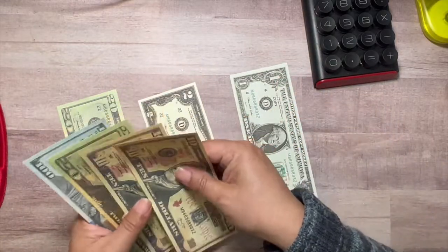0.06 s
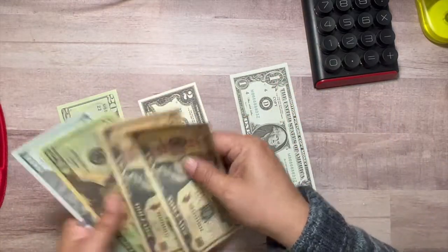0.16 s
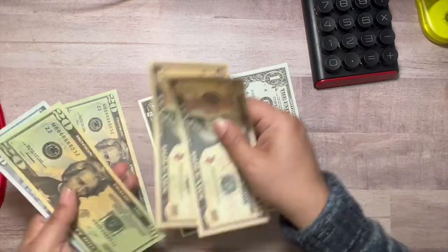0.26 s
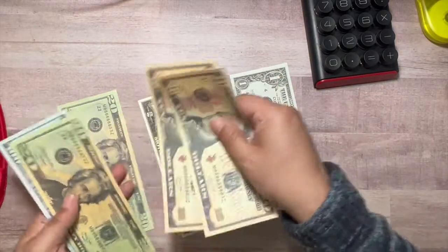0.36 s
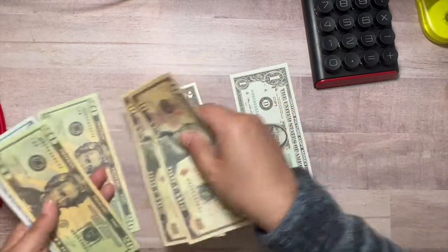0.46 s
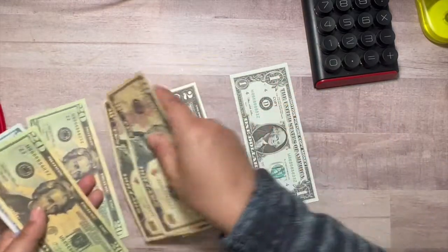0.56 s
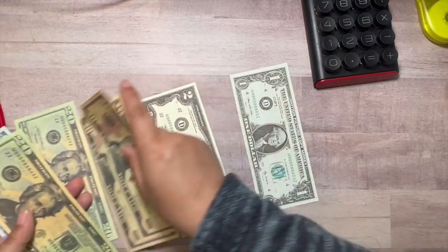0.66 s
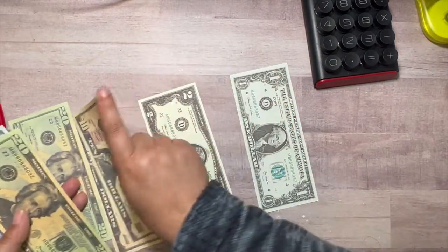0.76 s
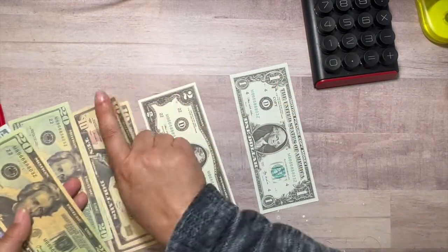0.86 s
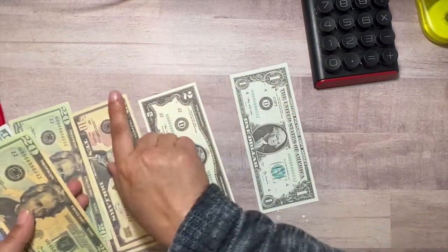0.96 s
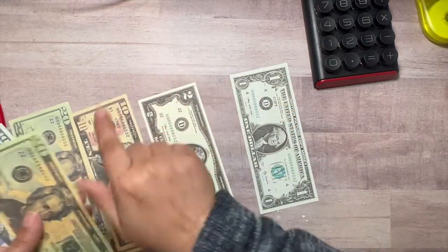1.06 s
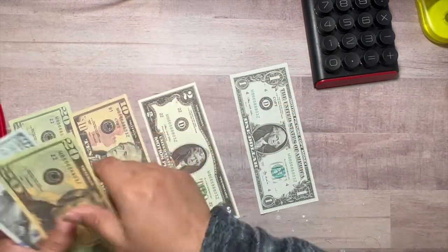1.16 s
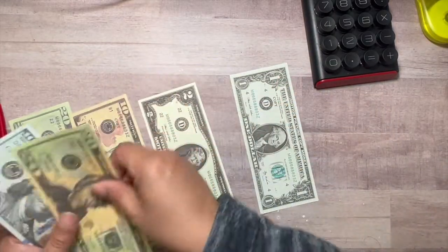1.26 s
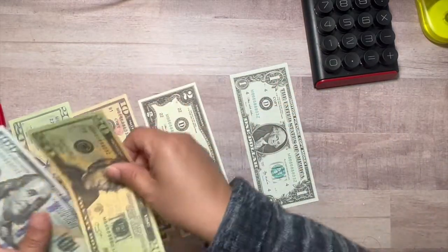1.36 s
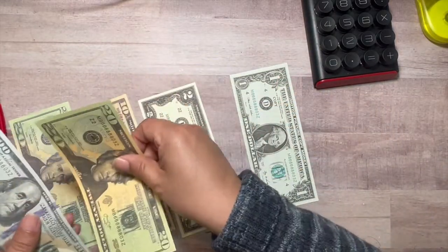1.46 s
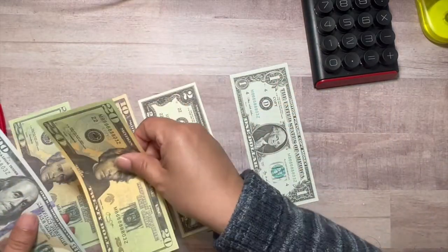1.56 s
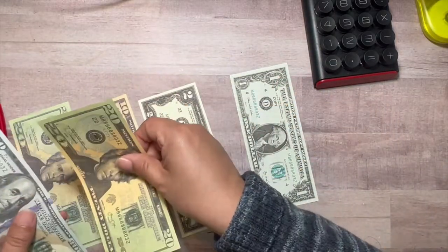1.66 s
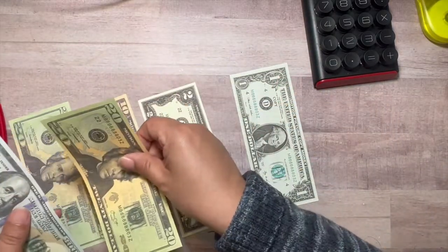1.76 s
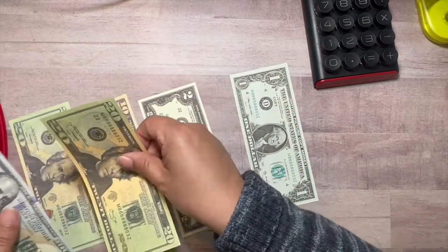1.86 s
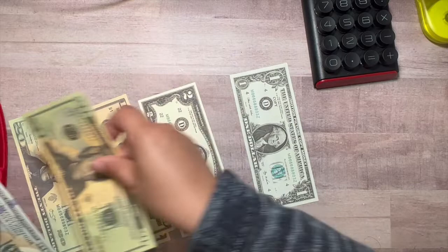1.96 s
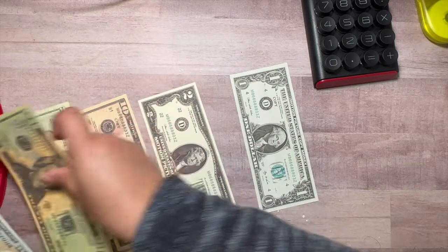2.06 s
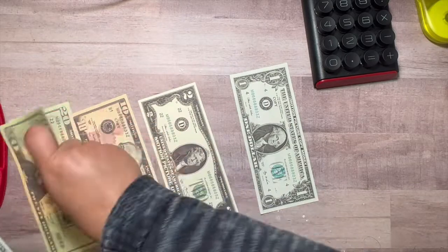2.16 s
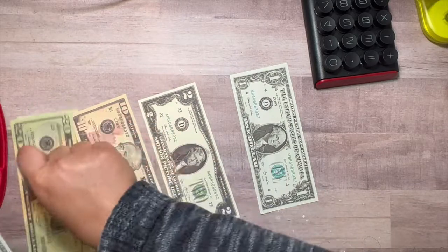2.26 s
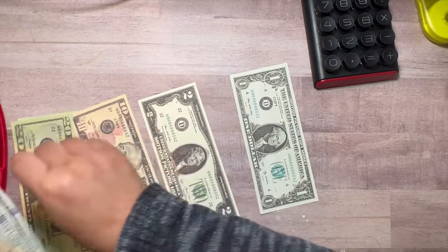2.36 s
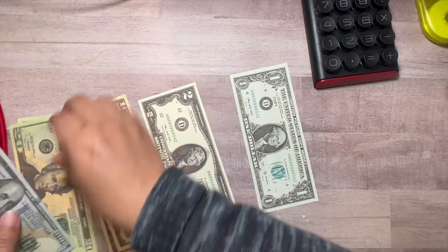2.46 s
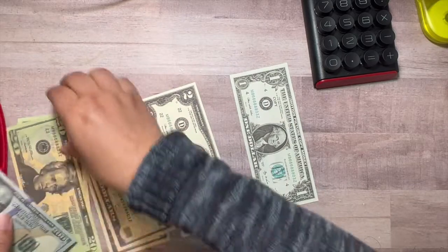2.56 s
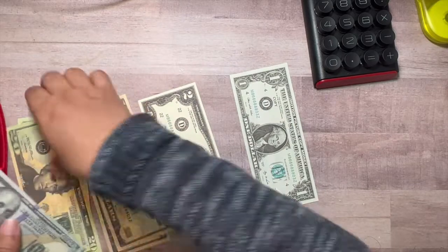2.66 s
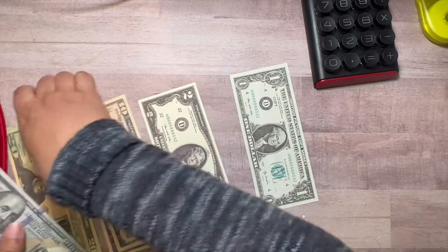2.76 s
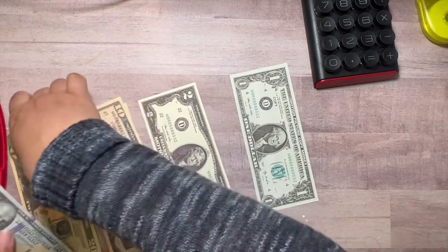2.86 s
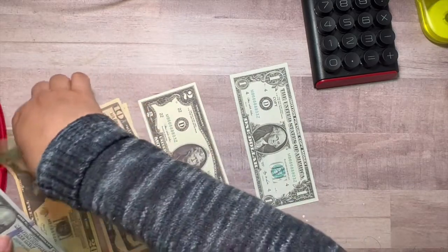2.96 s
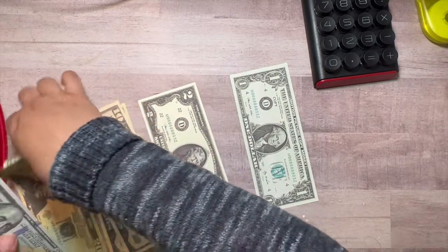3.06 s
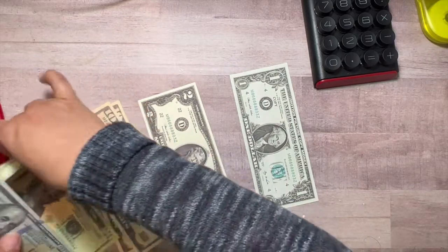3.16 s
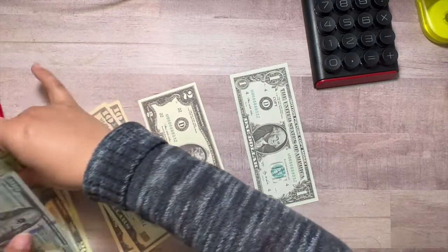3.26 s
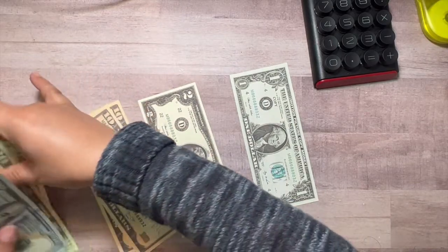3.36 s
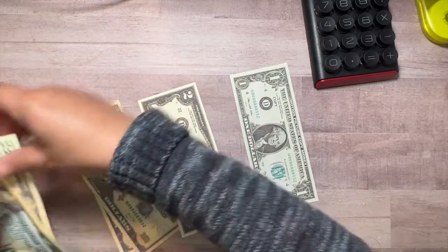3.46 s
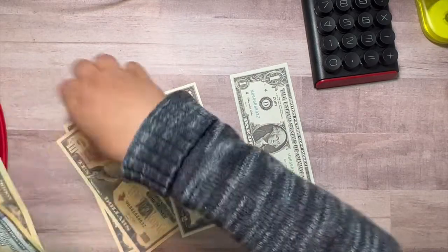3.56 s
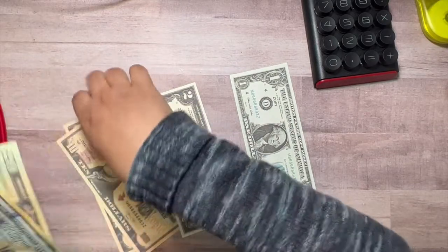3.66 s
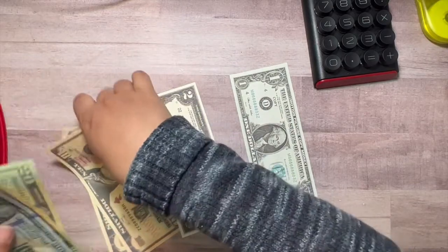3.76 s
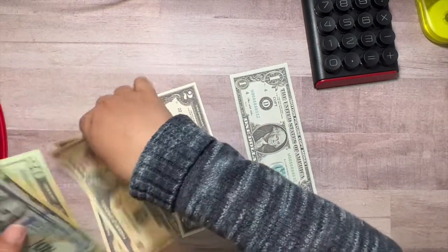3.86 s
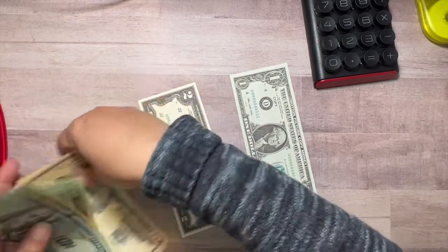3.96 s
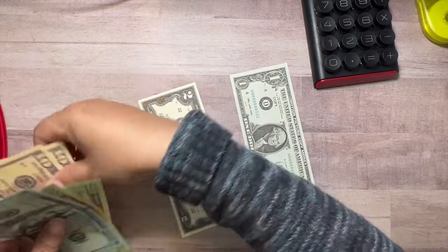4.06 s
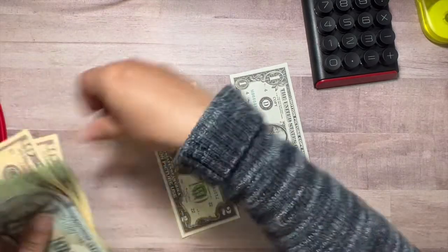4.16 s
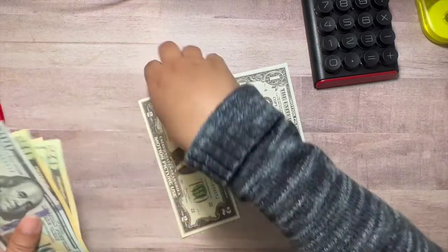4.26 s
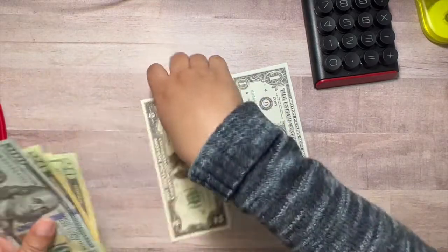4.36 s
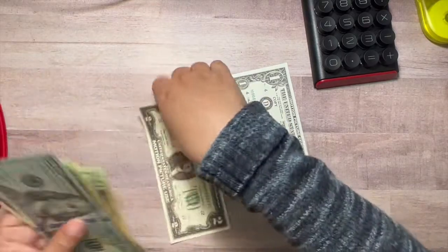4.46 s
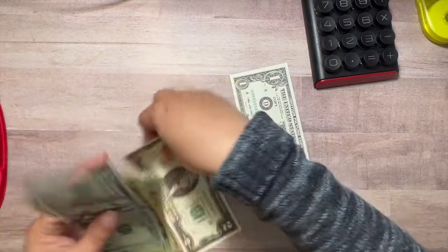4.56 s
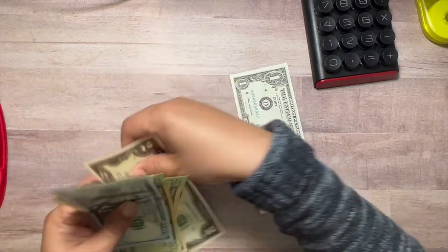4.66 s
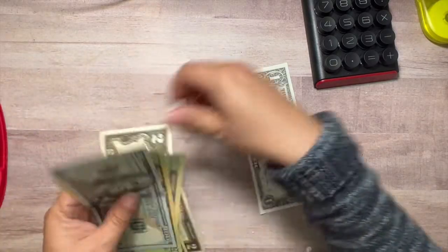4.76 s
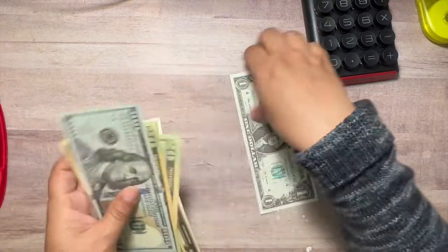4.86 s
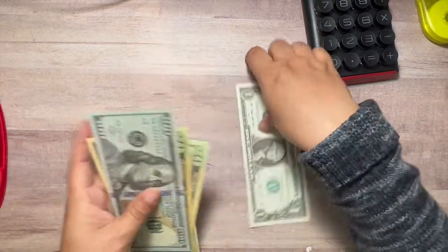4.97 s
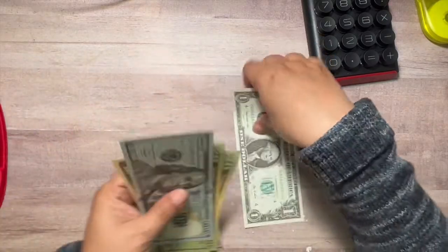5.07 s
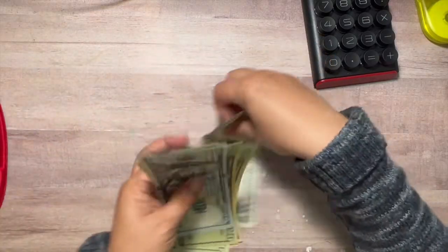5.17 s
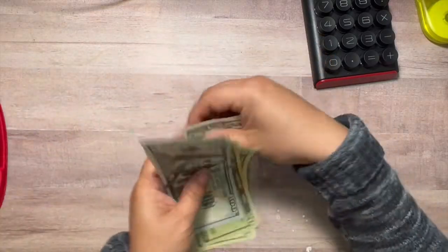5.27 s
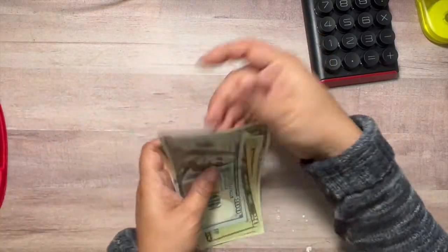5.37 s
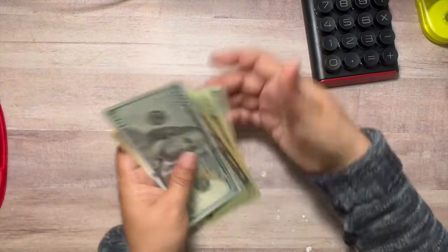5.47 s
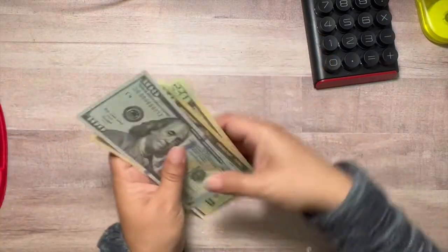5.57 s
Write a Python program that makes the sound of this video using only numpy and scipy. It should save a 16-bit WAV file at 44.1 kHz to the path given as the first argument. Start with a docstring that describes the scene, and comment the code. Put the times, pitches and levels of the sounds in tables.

```python
"""Hands sort paper notes on a wooden table: two ports of a microphone, quiet room, 5.6 s.
From the start: faint air and rumble, hiss and flap of the shifting bundle (noise, clumped clicks).
From 0.06 s sheets slide (swells of the same) and creases snap (short shaped noise with a tail).
From 0.66 s fingertips thud (falling sines, ringing modes); from 1.3 s short low hums swell up."""
import sys
import numpy as np
from scipy import signal
from scipy.fft import rfft, irfft
from scipy.io import wavfile
from scipy.ndimage import uniform_filter1d

SR = 44100
rng = np.random.default_rng(int(sys.argv[2]) if len(sys.argv) > 2 else 0)


def store_wav(level_fs):
    """Save 16-bit WAV to argv[1]."""
    pcm = np.round(np.clip(np.atleast_2d(level_fs), -1, 1) * 32767)
    wavfile.write(sys.argv[1], SR, pcm.T.astype(np.int16))


def how_loud(loudness_db):
    """Turn decibels into a plain amplitude multiplier (0 dB gives 1, 20 dB gives 10)."""
    steps = np.asarray(loudness_db, float) / 20
    return 10 ** steps


N = 247401
T = np.arange(N) / SR
HZ = np.fft.rfftfreq(512, 1 / SR)

# the held bundle shifts all the while: t/s, level/dB, hiss tilt/(dB per octave)
BUNDLE = [(0, -57.5, 4), (.95, -65, -3), (1.08, -58, -0.5), (1.4, -65.5, 1), (1.51, -77.5, -5),
          (1.75, -92, -2), (1.93, -59, -0.5), (2.5, -75, -4), (2.97, -59, 0), (3.87, -53.5, 0),
          (4.2, -55, 0.5), (4.5, -49, 0.5), (4.9, -59.5, -0.5), (5.07, -49.5, 0.5), (5.52, -57.5, 2)]
# creases popping, or crumpling when long: t/s, level/dB, centre f/Hz, fall-off/(dB per octave), length/ms
CREASES = [(0.0873, -35, 850, 5.5, 2.7), (0.157, -40, 860, 18, 24), (0.2473, -38.5, 980, 5, 4.8),
           (0.3392, -39.5, 874, 5.5, 6.2), (1.110, -45, 740, 6, 20), (1.161, -49, 400, 3, 8.9),
           (1.1882, -25, 2160, 3, 3.9), (1.526, -53, 3530, 0, 11), (1.825, -46, 1050, 26, 4.6),
           (1.949, -43, 1890, 3, 24), (1.994, -40.5, 3280, 2.5, 15), (2.016, -34, 4330, 8.5, 26.5),
           (2.0995, -27.5, 2310, 13.5, 9.5), (2.1461, -29.5, 2200, 3.5, 3.3), (2.322, -51, 4520, 22.5, 50),
           (2.3888, -50, 800, 9.5, 21.6), (2.6044, -41, 5050, 4, 3.8), (2.7581, -21, 2180, 6.5, 1.2),
           (2.901, -32, 2480, 28, 5.1), (2.925, -29.5, 2060, 3.5, 6.1), (3.065, -45, 4430, 12, 3),
           (3.2079, -29.5, 1850, 2.5, 3.1), (3.281, -35.5, 900, 4, 15), (3.333, -37.5, 950, 5, 11),
           (3.3811, -37, 970, 5.5, 5), (3.4969, -36.5, 945, 12, 4.2), (3.671, -29.5, 4700, 14, 2.1),
           (3.757, -18.5, 3300, 4.5, 3.84), (3.8069, -24, 4570, -2.5, 2.6), (3.9765, -29.5, 1200, 8.5, 13),
           (4.0003, -27, 1650, 7, 4.6), (4.0477, -27, 1310, 7.5, 3.9), (4.2035, -32, 3100, 7.5, 0.98),
           (4.3482, -29, 4020, 8, 2.3), (4.3657, -27.5, 3280, 7, 8.8), (4.3718, -14.5, 4960, 8.5, 8.8),
           (4.599, -31, 4250, 1, 11), (4.6407, -17.5, 3130, 4, 4.8), (4.942, -30, 10540, -12, 4.4),
           (4.9586, -16.5, 10400, 7, 5.1), (5.219, -25, 1510, 5.5, 4.2), (5.2782, -27.5, 1370, 6, 5.9)]
# fingertips and knuckles landing on wood: t/s, level/dB, nominal f/Hz
LANDINGS = [(0.657, -42, 330), (0.787, -47.5, 127), (2.143, -36, 135), (2.604, -37.5, 223),
            (2.693, -33.5, 231), (3.57, -37, 235), (3.635, -34.5, 245), (4.224, -34.5, 170),
            (4.311, -38, 268), (4.838, -32, 183), (4.905, -37, 154), (5.57, -46.5, 455)]


def evened(x):
    """Scales to rms 1."""
    return x / np.sqrt(np.mean(x ** 2) + 1e-20)


def read(points, hz):
    """Reads a table on a log-frequency axis."""
    f, value = np.transpose(points)
    return np.interp(np.log(hz + 1), np.log(f + 1), value)


def coloured(x, points):
    """Minimum-phase filter of the given spectral shape, taps scaled to unit energy."""
    log_gain = np.log(how_loud(read(points, abs(np.fft.fftfreq(8192, 1 / SR)))))
    taps = np.fft.ifft(np.exp(np.conj(signal.hilbert(log_gain)))).real[:4096]
    taps = taps / np.linalg.norm(taps)
    return signal.oaconvolve(x, taps.reshape((1,) * (x.ndim - 1) + (-1,)), axes=-1)[..., :N]


def add(mix, s, sound):
    """Mixes a sound in at a time."""
    part = mix[max(round(s * SR), 0):][:len(sound)]
    part += sound[:len(part)]


def room_floor():
    """Faint air, partly common to both ports, and a lumpy common rumble as the stand shakes."""
    # f/Hz, relative level/(dB per Hz)
    air_shape = [(60, -5.5), (600, -26), (16000, -43)]
    # t/s, level/dB
    rumble_db = [(0, -67), (1.6, -84), (5, -65.5)]
    z = rng.standard_normal((4, N))
    air = how_loud(-76.5) * coloured(0.93 * z[:2] + z[2], air_shape)
    rumble = coloured(z[3], [(25, -24), (55, -11.0), (400, -39.5)])
    return air + how_loud(np.interp(T, *np.transpose(rumble_db))) * rumble


def rubbing(per_s, grain_share, flutter_db):
    """Fibres hiss while tiny buckles click in clumps; contact pressure flutters."""
    flutter = evened(uniform_filter1d(rng.standard_normal(N), size=300))
    size = how_loud(3 * np.minimum(rng.exponential(1, N), 3))
    struck = rng.random(N) < per_s * np.exp(flutter) / SR
    clicks = size * struck * rng.standard_normal(N)
    hiss = rng.standard_normal(N)
    return evened((hiss + grain_share * evened(clicks)) * how_loud(flutter_db * flutter))


def effort():
    """Bundle, strokes, settling and slapped sheets add up in power: gains of hiss and of flap."""
    # sheets pulled over each other: t/s, length/s, level/dB, slackness (flap over hiss)/dB
    pulls = [(0.057, 0.12, -50.5, -7), (0.588, 0.12, -45.5, -24), (0.721, 0.078, -50.5, -18),
             (0.835, 0.011, -47.5, -23), (1.106, 0.042, -51.5, -2.5), (1.226, 0.094, -47.5, -19),
             (1.725, 0.024, -65.5, -11), (2.851, 0.095, -48.5, -7), (3.133, 0.073, -53, -39),
             (3.447, 0.027, -51, -0.5), (3.55, 0.041, -48.5, -12), (3.859, 0.05, -43, -14),
             (3.935, 0.04, -40.5, -25), (4.729, 0.011, -38.5, -9), (4.809, 0.013, -43, -7.5),
             (5.152, 0.11, -42.5, -9.5), (5.553, 0.025, -51, -2)]
    grip_s, let_go_db_per_s = 0.01, 346
    settle_db, settle_db_per_s, settle_slack_db = -18, 219, -11.5
    slap_db, slap_slack_db = -35, 10.5
    bundle_slack_db = -12.5

    rows = [(s, length, db, slack_db, let_go_db_per_s) for s, length, db, slack_db in pulls]
    # after a snap the sheets slide back to rest
    rows += [(s, 0, db + settle_db, settle_slack_db, settle_db_per_s) for s, db, *_ in CREASES]
    # a landing hand also slaps the notes under it
    rows += [(s, 0, db + slap_db, slap_slack_db, let_go_db_per_s) for s, db, _ in LANDINGS]

    bundle_db = np.interp(T, *np.transpose(BUNDLE)[:2])
    power = how_loud(2 * bundle_db) * how_loud([[0], [2 * bundle_slack_db]])
    t = T[:SR // 2]
    for s, length, db, slack_db, fall_db_per_s in rows:
        onset = np.minimum(t / grip_s, 1) ** 2
        shape = onset * how_loud(db - fall_db_per_s * np.maximum(t - length, 0))
        add(power[0], s, shape ** 2)
        add(power[1], s, (how_loud(slack_db) * shape) ** 2)
    return np.sqrt(power)


def brightened(x):
    """Tilts the spectrum above 1 kHz about 4 kHz as the grip tightens or slackens."""
    _, t, z = signal.stft(x, SR, nperseg=512)
    s, _, tilt_db = np.transpose(BUNDLE)
    octaves = np.log2(np.maximum(HZ, 1000) / 4000)[:, None]
    tilted = z * how_loud(octaves * np.interp(t, s, tilt_db))
    return signal.istft(tilted, SR, nperseg=512)[1][:N]


def patchy(x, patchy_db):
    """The bending sheet favours now one stretch of pitch, now another."""
    z = signal.stft(x, SR, nperseg=512)[2]
    patches = uniform_filter1d(rng.standard_normal(z.shape), size=14, axis=0)
    patches = evened(uniform_filter1d(patches, size=9, axis=1))
    return signal.istft(z * how_loud(patchy_db * patches), SR, nperseg=512)[1][:N]


def strokes():
    """Sliding excites fine hiss and the slack low flap of the whole sheet."""
    # f/Hz, relative level/(dB per Hz)
    slide_shape = [(450, -18), (2000, -1), (7000, 2), (9000, -3.5), (16000, 0)]
    # f/Hz, relative level/(dB per Hz)
    flap_shape = [(150, -2.5), (1000, -0.5), (1600, 0), (3200, -20.5)]
    slide = coloured(rubbing(per_s=1500, grain_share=0.4, flutter_db=1.0), slide_shape)
    flap = coloured(rubbing(per_s=900, grain_share=0.24, flutter_db=4.0), flap_shape)
    hiss_gain, flap_gain = effort()
    return patchy(hiss_gain * brightened(slide) + flap_gain * flap, patchy_db=2.0)


def snaps():
    """A crease gives way in milliseconds of dense cracks, then the sheet shivers in the same colour."""
    shiver_db, shiver_t60_s = -11.5, 0.075
    skirt_db = 20.5  # deepest fall of the colour
    out, t = np.zeros(N), np.arange(8000) / SR
    for s, db, hz, fall_db, ms in CREASES:
        u = t / (ms / 1000)
        burst = np.minimum(u / 0.44, 1) ** 2 * np.exp(-u ** 3)
        shiver = how_loud(shiver_db - 60 * t / shiver_t60_s) * np.minimum(u, 1)
        shape = burst + shiver
        reach = 2 ** (skirt_db / max(fall_db, 1))  # fall-off is 1 dB per octave at least
        colour = [(hz / reach, -skirt_db), (hz, 0), (hz * reach, -skirt_db)]
        crack = coloured(shape * rng.standard_normal(len(t)), colour)
        crack *= np.linalg.norm(shape) / np.linalg.norm(crack)
        add(out, s - 0.0015, how_loud(db - 2.5) * crack)
    return out


def thuds():
    """Bending waves arrive treble first: after a tick each thud falls in pitch, then the modes ring on."""
    # table-top modes: f/Hz, highest relative level/dB, t60/s
    modes = [(58.3, -5, 0.18), (109.6, -4.5, 0.23), (143.7, -6, 0.33), (168, -0.5, 0.22)]
    tap_db, tap_hz, tap_s = -5, 1046, 0.0025  # nail ticks on the wood
    knock_s = 0.0043  # the blow peaks just after
    out, t = np.zeros(N), np.arange(SR // 2) / SR
    grit = uniform_filter1d(rng.standard_normal((len(LANDINGS), len(t))), size=40)
    grit = 1 + 0.51 * evened(grit)
    for (s, db, hz), rough in zip(LANDINGS, grit):
        cycles = np.cumsum(hz * (0.794 + 1.44 * np.exp(-t / 0.0039))) / SR
        blow = np.sin(2 * np.pi * cycles) * (t / knock_s * np.exp(1 - t / knock_s)) ** 2
        tick = how_loud(tap_db) * np.sin(2 * np.pi * tap_hz * t + rough) * np.exp(-t / tap_s)
        ring = np.zeros(len(t))
        for (f, mode_db, t60), r in zip(modes, rng.random(len(modes))):
            # one draw sets both level (down to -10 dB) and phase
            gain = how_loud(mode_db - 60 * t / t60 + 10.0 * (r - 1.0))
            ring += gain * np.sin(2 * np.pi * (f * t + r))
        ring *= how_loud(-3.5) * rough * (1 - np.exp(-t / 0.019))
        add(out, s, how_loud(db) * (0.65 * (blow + tick) + ring))
    return out


def hums():
    """A wavering low tone and its octave swell up, perhaps the table top under a dragging forearm."""
    # start/s, end/s, level/dB
    swells = [(1.334, 1.396, -61), (2.069, 2.157, -54), (4.538, 4.614, -60.5), (5.285, 5.4, -55)]
    hum_hz = 146
    out = np.zeros(N)
    waver = evened(uniform_filter1d(rng.standard_normal(N), size=900))
    phase = 2 * np.pi * np.cumsum(hum_hz * (1 + 0.013 * waver)) / SR
    tone = np.cos(phase) + how_loud(-12.0) * np.cos(2 * phase)
    for start, end, db in swells:
        rise = np.clip((T - start) / 0.05, 0, 1)
        out += how_loud(db) * rise * how_loud(-60 * np.maximum(T - end, 0) / 0.2 + waver) * tone
    return out


def ports(x):
    """The sound reaches the left port first and, in the treble, louder."""
    # ports' shading, left over right: f/Hz, level/dB before the bass taper
    shading = [(700, 8.5), (2400, 9.5), (4400, 16), (9000, 7.5)]
    # the hands move across: t/s, lag of right port/ms
    right_lag = [(0, 0.23), (3.2, 0.37), (5.6, 0.16)]
    _, t, z = signal.stft(x, SR, nperseg=512)
    treble = np.clip(HZ / 1200, 0, 1)[:, None]  # bass reaches both ports alike
    tilt_db = read(shading, HZ)[:, None] * treble / 2
    lag_s = np.interp(t, *np.transpose(right_lag)) / 1000
    lag = np.exp(-2j * np.pi * HZ[:, None] * lag_s)
    both = np.array([z * how_loud(tilt_db), z * lag / how_loud(tilt_db)])
    return signal.istft(both, SR, nperseg=512)[1][:, :N]


def room(x):
    """Sparse random-sign echoes, each band dying at its own speed."""
    # f/Hz, t60/s
    decay = [(300, 0.15), (4000, 0.24), (12000, 0.054)]
    # five random path sets crossfade in turn, 20 a second, so no fixed resonance stands out
    paths, paths_per_s = 5, 20
    taps = np.zeros((paths, 2, SR // 2))
    at = np.arange(150, SR // 2 - 20, 20)
    at = at + rng.integers(0, 20, (paths, 2, len(at)))
    np.put_along_axis(taps, at, rng.choice([-1., 1.], at.shape), 2)
    hz, t, z = signal.stft(taps, SR, nperseg=256)
    tails = signal.istft(z * how_loud(-60 * t / read(decay, hz)[:, None]), SR, nperseg=256)[1]
    tails = tails / np.linalg.norm(tails[0, 0])
    away = (T * paths_per_s - np.arange(paths)[:, None] + 1) % paths - 1
    share = np.cos(np.pi / 2 * np.minimum(abs(away), 1))  # equal-power crossfade
    return signal.oaconvolve((x * share)[:, None], tails, axes=2).sum(0)[:, :N]


def scene():
    """Paper near the ports and in the room, wood and floor below."""
    floor = room_floor()
    paper = strokes() + snaps()
    return ports(paper + thuds() + hums()) + how_loud(-6.0) * room(paper) + floor


def shared_treble(x):
    """Left treble replaces the right's around 7.9 kHz and up, with phase advancing along frequency."""
    shared_from_hz, in_step_hz = 7900, 8300
    turn_hz = 3720  # one full turn of phase, so the right is slightly early
    z, hz = rfft(x), np.fft.rfftfreq(N, 1 / SR)
    high = np.clip((hz - shared_from_hz) / 2400 + 0.5, 0, 1)
    shifted = z[0] * np.exp(2j * np.pi * (hz - in_step_hz) / turn_hz)
    return irfft([z[0], np.sqrt(1 - high) * z[1] + np.sqrt(high) * shifted], N)


def top_cut(x):
    """Nothing passes above the cut-off."""
    return signal.sosfilt(signal.butter(12, 17130, fs=SR, output="sos"), x)


def record(dry):
    """Microphone colour, shared treble, output level."""
    # f/Hz, relative level/dB
    mic_response = [(30, -22), (50, 3.5), (11600, -3.5), (15700, -13.5), (16300, -50)]
    mix = how_loud(-3.5) * shared_treble(coloured(dry, mic_response))
    return top_cut(mix)


dry = scene()
out = record(dry)
store_wav(out)
```